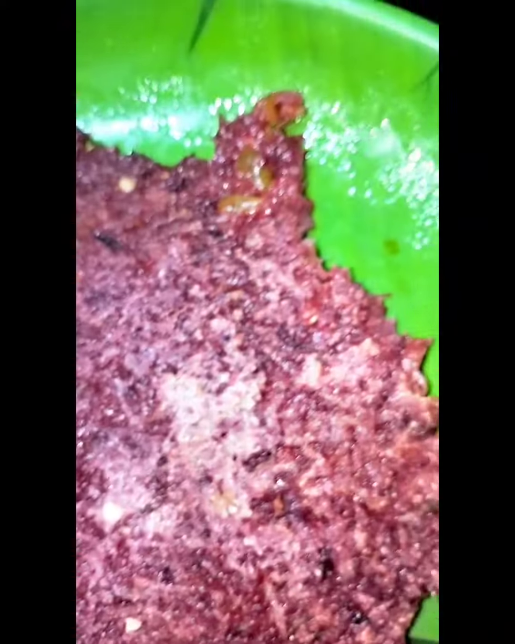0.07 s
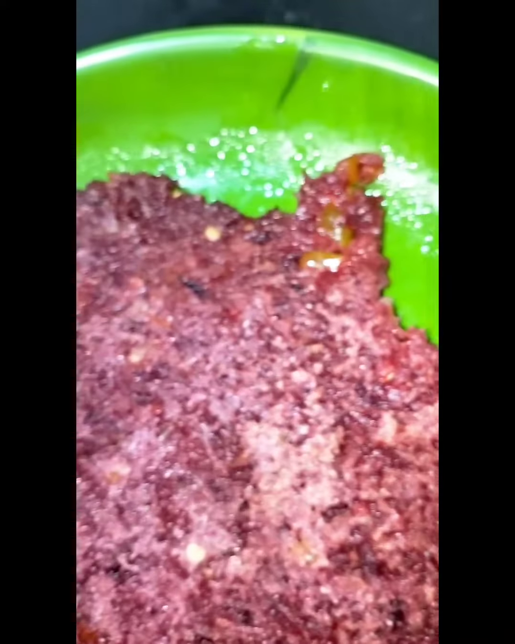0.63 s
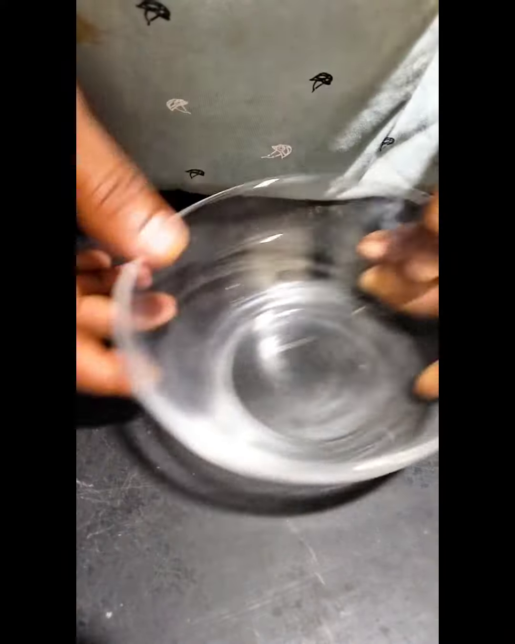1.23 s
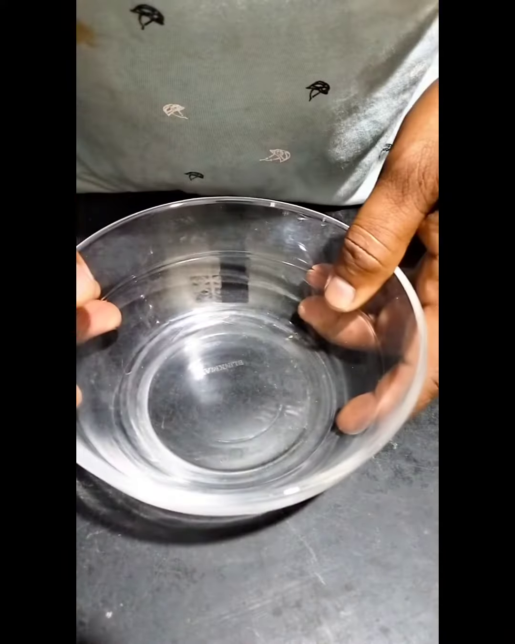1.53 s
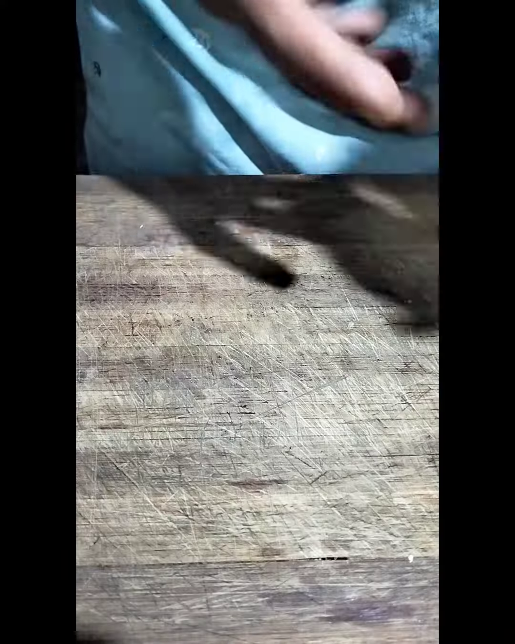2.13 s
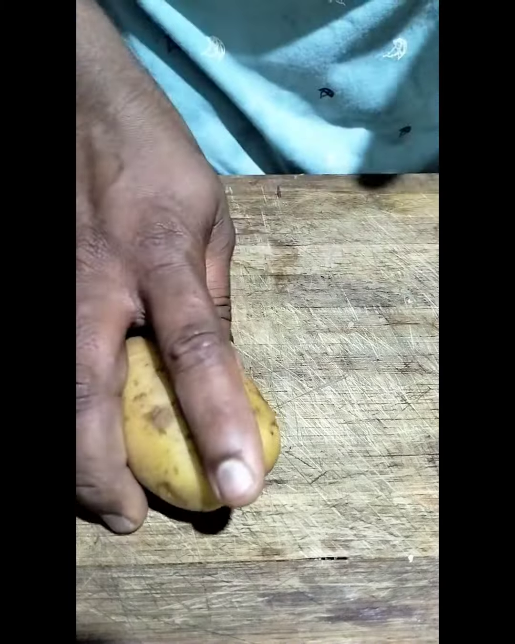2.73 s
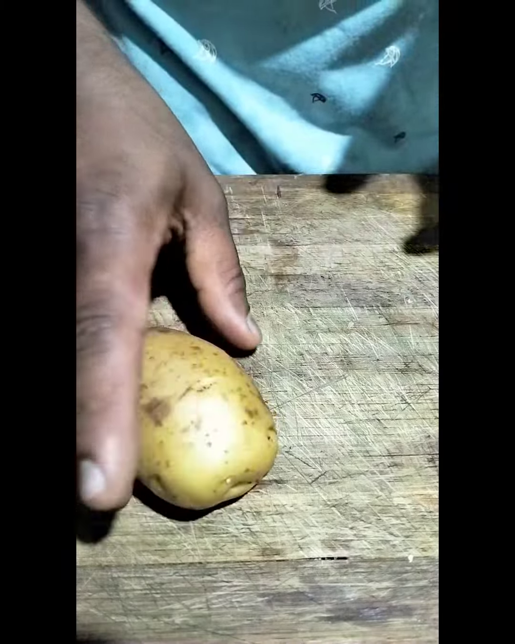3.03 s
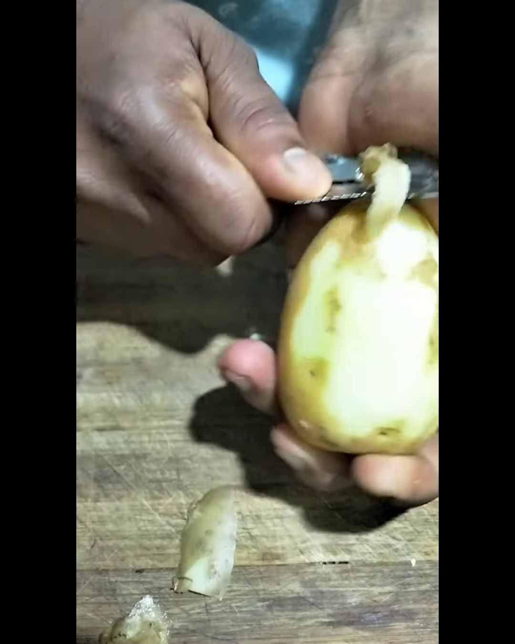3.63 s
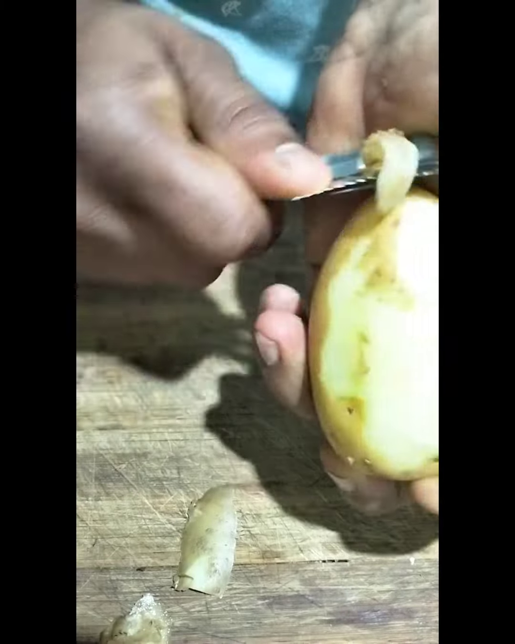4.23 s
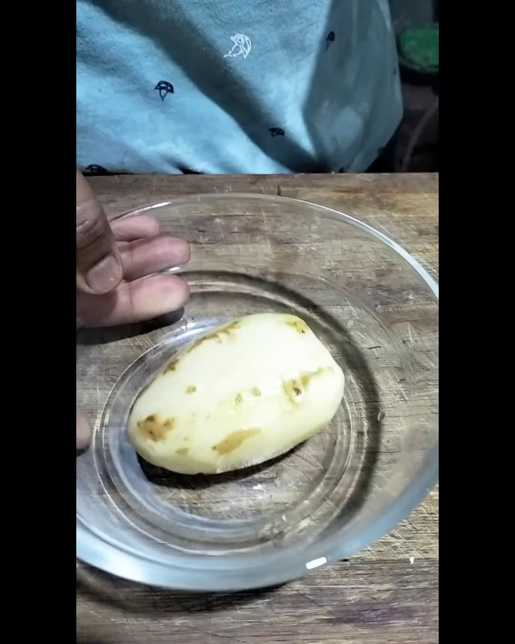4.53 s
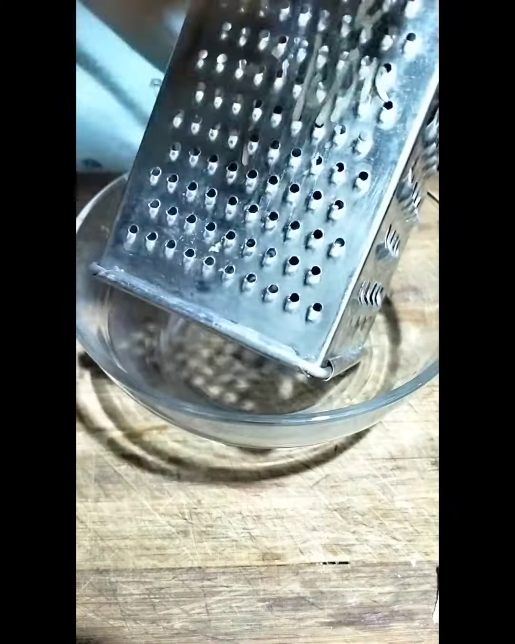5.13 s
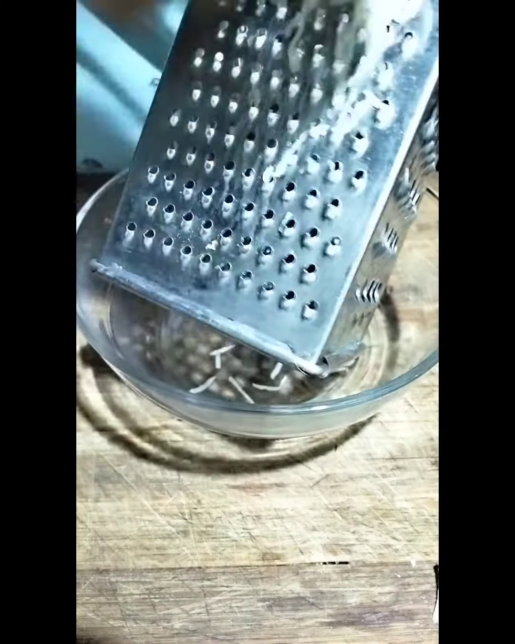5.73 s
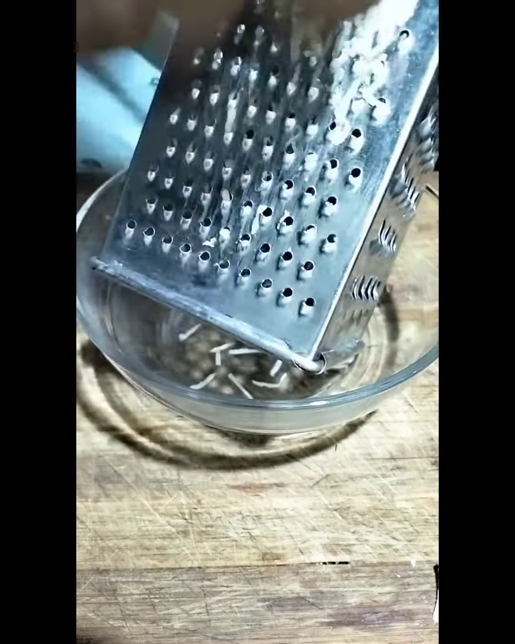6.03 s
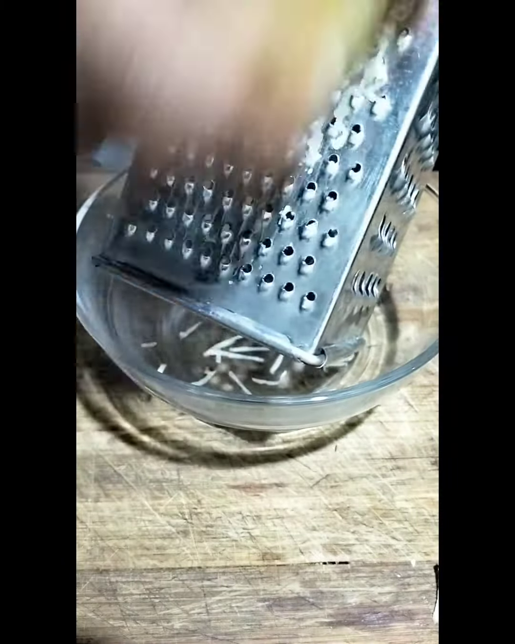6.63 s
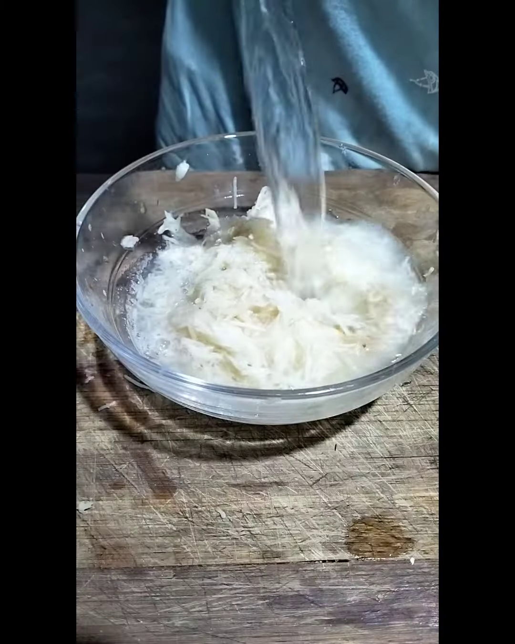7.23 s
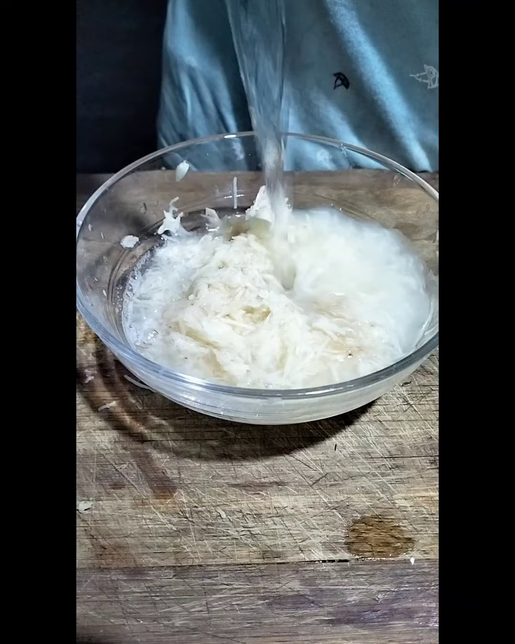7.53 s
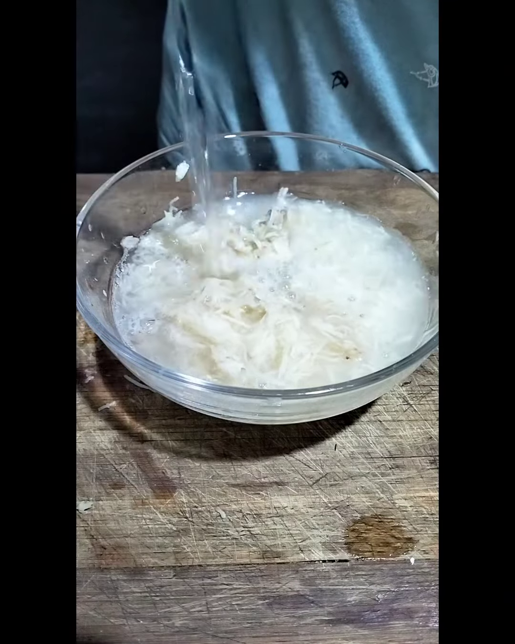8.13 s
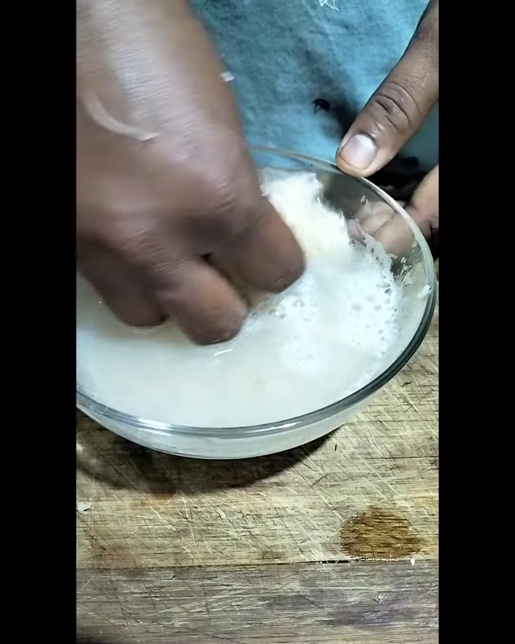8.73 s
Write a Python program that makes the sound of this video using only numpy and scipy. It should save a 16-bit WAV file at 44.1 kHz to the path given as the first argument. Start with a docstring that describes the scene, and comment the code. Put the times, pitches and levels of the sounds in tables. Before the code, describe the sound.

Close kitchen sounds: a bowl rocking on a counter, a potato's thud, crisp peeling, quick grating strokes and gurgling, splashing water.

```python
"""A small, hard kitchen, close up, over low rumble and a thin whine that shift from task to task.
A glass bowl knocks on the counter and rocks to rest. A potato thumps on a wooden board, is rolled
by hand and peeled with a crisp fizz. Seven strokes rasp it over a steel box grater standing in
the bowl. Water lands on the shreds in gobs, all gurgle, spray and bubbles; then fingers stir them."""
import sys
import numpy as np
from scipy import signal
from scipy.fft import rfft, irfft
from scipy.io import wavfile
from scipy.ndimage import uniform_filter1d

SR = 44100
rng = np.random.default_rng(int(sys.argv[2]) if len(sys.argv) > 2 else 0)


def dump_mix(stems):
    """Bounce the given channels to the path in sys.argv[1] as a 16-bit WAV at rate SR."""
    frames = np.atleast_2d(stems).T  # one column per channel
    limited = np.clip(frames, -1, 1)  # hard clip at full scale
    pcm = np.round(limited * 32767).astype(np.int16)
    wavfile.write(sys.argv[1], SR, pcm)


N = 391166
TIME = np.arange(N) / SR

# Table levels are relative: each layer has its own trim.
# five colours of room tone: f/Hz, level/dB
QUIET_AIR = [(15, -38), (25, -4), (54, -3.5), (118, -16.5), (363, -18.5), (404, -17.5), (450, -20),
             (2020, -44), (2300, -38), (2560, -45.5), (15000, -57.5)]
WHINY_AIR = [(15, -37.5), (25, -2.5), (106, 0), (354, -11.5), (438, -19), (903, -20.5), (1390, -24.5),
             (2180, -22), (2500, -18.5), (3350, -34), (4150, -12), (5010, -36.5), (7200, -39), (8000, -48),
             (9200, -37), (9900, -43), (10700, -39.5), (12000, -46), (15500, -50)]
KITCHEN_AIR = [(15, -55), (25, -12), (59, 0), (118, -11), (335, -13), (373, -18), (637, -19), (749, -26.5),
               (1280, -26.5), (5280, -44), (6900, -50), (15000, -55)]
BUSY_AIR = [(15, -34.5), (25, -14), (49, 1.5), (81, -14), (186, -10), (501, -27.5), (604, -33),
            (1090, -31.5), (1760, -41.5), (3730, -50), (5880, -51), (6370, -50), (15000, -63)]
LAST_AIR = [(15, -39), (25, 3), (125, -3), (158, -1), (257, -6.5), (415, -13), (1030, -21), (2180, -36),
            (5570, -42), (6540, -39.5), (15000, -57)]
# room tone cues: start/s, end/s, level/dB, colour
AIR_CUES = [(0, 0.784, -56, QUIET_AIR), (0.798, 3.126, -49, WHINY_AIR), (3.134, 4.46, -51.5, KITCHEN_AIR),
            (4.466, 6.897, -46, BUSY_AIR), (6.903, 8.887, -55.5, LAST_AIR)]
# narrow bands of hiss: start/s, end/s, f/Hz, width/Hz, level/dB
WHINE_BANDS = [(.797, 3.127, 2520, 100, -58), (.797, 3.127, 4170, 330, -55), (0, 0.66, 6000, 120, -96),
               (0, .797, 6430, 150, -86), (0.89, 8.88, 6560, 930, -77)]
# reverb time: f/Hz, t60/s
ROOM_DECAY = [(80, 0.2), (300, 0.22), (1100, 0.15), (2500, 0.18), (6000, 0.16), (15000, .14)]
# colour of the reflections: f/Hz, level/dB
REVERB_EQ = [(60, -6), (400, 0), (750, -1), (950, -2.5), (1600, 2), (2100, 2), (15000, 0)]
# standing waves between the walls: f/Hz, level/dB, t60/s
STANDING_WAVES = [(84, 2, .65), (151, 0, .6), (192, -2, .4), (287, 1, .35), (350, -4, .35), (540, -3, .4),
                  (902, -3, .4), (947, -2, .45), (1027, -4, .4), (1081, 4, .55), (1164, -2, .5),
                  (1224, -2, .5), (1305, 0, .45), (1389, -1, .4), (1443, 0, .4), (1533, 0, .4),
                  (1610, -1, .4), (1750, -1, .3), (1986, 4, .3)]

# fingers pushing the soaked shreds: t/s, level/dB
STIR_FADER = [(8.56, -76), (8.63, -70), (8.762, -53.5), (8.86, -56)]
# wet crackle and low slosh: f/Hz, level/dB
CRACKLE_EQ = [(300, -6), (600, -6), (1600, 2.5), (2300, -28), (3900, -13), (5200, -25), (6700, -8),
              (8000, -30), (15000, -23)]
SLOSH_EQ = [(40, -13), (90, 9), (220, 1.5), (600, -12), (1500, -47)]

# knife bites: t/s at the deepest, cut level/dB, fizz level/dB, rise/(dB/s)
PEEL_BITES = [(3.215, -55, -55, 550), (3.24, -53, -40, 2200), (3.466, -42.5, -45, 900),
              (3.5, -31.5, -34, 700), (4.05, -50.5, -55, 500), (4.09, -40.5, -42.5, 650),
              (4.44, -69, -61, 350)]
# the cut and its fine fizz: f/Hz, level/dB
CUT_EQ = [(500, -9), (950, -4.5), (1900, -15), (2900, -3), (4400, 3), (5300, 4), (6800, -4), (8200, -13),
          (11000, -30), (15000, -26.5)]
FIZZ_EQ = [(3000, -22), (7000, -3), (9000, -9), (12000, 2.5), (15500, -2)]
# the peel breaks: t/s, level/dB
PEEL_SNAPS = [(3.238, -31.5), (3.242, -41), (3.747, -35), (3.755, -38.5), (3.968, -51), (4.2453, -48.5),
              (4.401, -50)]
# colour of a snap: f/Hz, level/dB
SNAP_EQ = [(800, -23), (3000, 2.5), (4800, 6.5), (8000, -5), (15000, -24)]

# the potato lands and settles: t/s, level/dB, tilt/(dB/octave)
POTATO_HITS = [(2.588, 0.5, 1.5), (2.597, -12.5, 5), (2.6036, -10, -1)]
# the thud, skin on wood and the palm: f/Hz, level/dB
THUD_EQ = [(35, -22), (75, 9.5), (190, 5), (290, 8), (420, -7), (850, -10), (1450, -9.5), (2000, -15.5),
           (4400, -21.5), (5300, -34.5), (7400, -35.5), (9000, -46.5), (15000, -44)]
RUB_EQ = [(200, 1), (700, -0.5), (1500, 7), (3000, -4.5), (5000, -11), (8000, -19), (15000, -31)]
PALM_EQ = [(1000, -30), (3000, -10), (7500, 2), (9500, -6), (15000, -7)]
# ring of the wooden board: f/Hz, level/dB, t60/s
BOARD_MODES = [(86.3, -21, 0.95), (153.7, -8.5, 0.52), (277, -4, 0.18), (620, -6.5, 0.2), (735, -29, 0.2),
               (862, 5, 0.09), (1295, -0.5, 0.12), (1444, 10, 0.051), (1610, 5, 0.077), (1685, -1, 0.13)]
# a hand rolls the potato: t/s, level/dB
RUB_FADER = [(2.75, -64), (2.866, -52), (2.912, -51), (2.945, -39.5), (3.0, -56.5), (3.125, -60.5)]

# bowl on counter: t/s, knock level/dB, tilt/(dB/octave), ring level/dB
BOWL_HITS = [(1.1035, 3, 1.5, -27), (1.1656, 0.5, 1, -39), (1.188, -1.5, -0.5, -33.5),
             (1.201, -5, 0, -63.5), (1.249, -18.5, -6.5, -59), (1.26, -10.5, -1, -58),
             (1.277, -15, -6.5, -48), (1.312, -23, -11, -51), (1.3536, -4, 4, -36.5), (1.407, -12, -7, -50)]
# the bowl knocking and rolling: f/Hz, level/dB
KNOCK_EQ = [(50, -26.5), (85, -11), (200, -19.5), (320, 0), (440, -27), (700, -13.5), (1080, -0.5),
            (1550, -9), (1900, -12.5), (3300, -20.5), (4400, -31), (5400, -52.5), (15000, -66)]
ROLL_EQ = [(35, -44), (60, -30), (206, -23.5), (291, -8), (404, -10), (529, -7.5), (583, -16.5), (944, 7),
           (2780, -30), (4240, -63.5), (6000, -62), (7800, -94), (13200, -120)]
# the bowl rocks to rest: t/s, level/dB
ROLL_FADER = [(1.21, -22), (1.27, -23), (1.31, -19), (1.345, -20.5), (1.38, -28), (1.42, -27), (1.45, -45),
              (1.56, -39.5), (1.63, -63)]
# the glass singing and its wall clinking: f/Hz, level/dB, t60/s
GLASS_MODES = [(6790, -3.5, 0.2), (6820, -11, 0.3), (10250, -12.5, .25), (10310, -15, .4),
               (12720, -25, .35), (14600, -20.5, .28)]
CLINK_MODES = [(2250, -4, .25), (2719, -7, .28), (3150, 0, .11), (3429, -2, .14)]
# rough glassy ring as the bowl's foot slides on the counter: f/Hz, level/dB, t60/s
FOOT_SCRAPE_MODES = [(6900, -3.5, .09), (10430, 1, 0.036), (12600, -1, 0.032), (14620, -5, 0.03)]

# strength of the pour: t/s, gurgle level/dB, spray level/dB
POUR_FADERS = [(6.905, -47, -46), (7.131, -43.5, -46.5), (7.149, -48, -54.5), (7.263, -48, -48.5),
               (8.143, -44, -46.5), (8.225, -48.5, -42), (8.285, -43, -55), (8.443, -37, -38.5),
               (8.535, -40.5, -49)]
# how much of the jet meets standing water: t/s, share/0-1
POOL_SHARE = [(6.9, 0), (8.1, 0.29), (8.35, 0.98), (8.54, 0.78)]
# water on shreds, into standing water, and as spray: f/Hz, level/dB
SHALLOW_EQ = [(120, -44), (200, -4), (223, -28), (286, 12.5), (441, -28), (474, -9), (670, -8), (756, -2.5),
              (1060, -2.5), (1150, -15), (1530, -9), (1970, -18), (3500, -12.5), (4550, -30), (7700, -120)]
DEEP_EQ = [(88, -76), (150, -3), (195, 2), (337, -8), (476, 1.5), (769, -2), (1030, -18), (1570, -8.5),
           (2510, -16.5), (3080, -22), (4000, -15), (5200, -67), (8800, -120)]
SPRAY_EQ = [(1500, -12), (2300, -18), (3200, -5), (4400, 1), (5100, -3.5), (5800, -3), (7100, -1.5),
            (7900, -12.5), (10000, -11), (12500, -9), (15500, -15.5)]
# the bowl drummed by water: f/Hz, level/dB, t60/s
WET_BOWL_MODES = [(662, -1, 0.084), (903, -1, 0.063), (1026, -4, 0.066), (1527, 0.5, 0.03)]
# the biggest gulps: t/s, level/dB
BIG_PLOPS = [(6.979, -37), (7.076, -28), (7.101, -28), (7.132, -34), (7.319, -26), (7.404, -33),
             (7.538, -29), (7.58, -24.5), (7.615, -30), (7.69, -30.5), (7.863, -33.5), (7.938, -27),
             (8.017, -31), (8.105, -24.5), (8.13, -32), (8.272, -27), (8.324, -25), (8.397, -24),
             (8.493, -24.5)]
# bright single bubbles, and clusters of air dragged under: t/s, level/dB, f/Hz
BRIGHT_BUBBLES = [(7.065, -25.5, 6140), (7.257, -32.5, 6980), (7.429, -26, 4900), (7.437, -27, 4820),
                  (7.6028, -22.5, 6640), (7.657, -27.5, 4780), (7.6906, -27.5, 7140), (7.731, -26.5, 5000),
                  (7.7385, -25.5, 4330), (7.935, -25, 3770), (8.072, -27, 4100), (8.1064, -27.5, 4000),
                  (8.2136, -24, 4250), (8.3923, -30, 4100), (8.462, -24.5, 4940), (8.5142, -23.5, 4550)]
BUBBLE_CLUSTERS = [(7.076, -33, 2130), (7.278, -32.5, 1560), (7.32, -32, 2160), (7.9365, -29.5, 1520),
                   (8.0175, -31.5, 1580), (8.31, -32, 1580), (8.408, -18.5, 3120), (8.461, -29, 1690)]

# strokes down through the teeth and back: t/s, length/s, level/dB, peak position/0-1
DOWN_STROKES = [(4.988, 0.16, -18, 0.35), (5.288, 0.15, -17.5, 0.49), (5.595, .16, -18, 0.43),
                (5.885, 0.15, -18.5, 0.49), (6.175, .15, -17.5, 0.36), (6.46, 0.13, -18.5, 0.43),
                (6.755, 0.15, -17.5, 0.52)]
BACK_STROKES = [(5.15, .15, -30, 0.47), (5.45, 0.16, -30.5, 0.5), (5.75, .15, -30.5, 0.49),
                (6.01, 0.17, -30.5, 0.65), (6.32, 0.14, -31.5, 0.71), (6.59, 0.16, -33, 0.72)]
# teeth tearing, potato sliding back, board shaking: f/Hz, level/dB
RASP_EQ = [(120, -50.5), (200, -6.5), (471, -15), (564, -4), (742, -8), (1050, -1), (1510, -7),
           (1910, -13.5), (3010, -5.5), (4260, -1.5), (5910, -8), (7090, -2.5), (7900, -12), (11600, -11),
           (15500, -13.5)]
SLIDE_EQ = [(120, -30.5), (200, -5), (371, -12), (769, -3), (842, -5), (1030, -1), (1210, -6), (1880, -15),
            (2090, -9.5), (2600, -13), (4260, -4.5), (4920, -10.5), (7090, -14), (7900, -17), (15500, -19)]
SHAKE_EQ = [(30, -30), (52, -14), (82, 4.5), (110, -12), (145, -11), (190, -6.5), (240, -22), (600, -33)]
# the grater is picked up; its foot hits the glass: t/s, level/dB
PICKUP_CLINKS = [(4.745, -64), (4.885, -66)]
FOOT_HITS = [(5.325, -12), (5.616, -11), (5.908, -19), (6.206, -12), (6.48, -18.5), (6.799, -14)]
# ring of the steel box, the back stroke, the pickup and the foot: f/Hz, level/dB, t60/s
STEEL_MODES = [(531, -10, .2), (1016, -3.5, .15), (1500, -5, 0.21), (2234, 1.5, .55), (2220, -3, 0.5),
               (2444, -6.5, 0.34), (2993, 2, 0.31), (3700, -2.5, 0.28), (3850, 4.5, .18), (4300, -6, 0.13),
               (4320, -2, 0.32), (4800, -5, .2), (7300, 4, .12), (7300, 1, .08)]
SLIDE_MODES = [(1040, 0, 0.073), (800, -5.5, 0.027), (7030, 2.5, 0.026)]
PICKUP_MODES = [(1060, 6.5, .4), (2234, -3.5, .5), (3770, -2.5, .35), (4380, -6, .25)]
FOOT_MODES = [(1074, -3, .044), (1484, -1, .035), (2327, -10, .17)]

POUR_START_S, POUR_END_S = 6.903, 8.543


def amp(db):
    """Decibels to gain."""
    return 10 ** (np.asarray(db) / 20)


def unit_rms(x):
    """Scales to rms 1."""
    return x / np.sqrt(np.mean(x ** 2) + 1e-20)


def curve_at(points, hz):
    """Reads a table on a log-frequency axis."""
    f, value = np.transpose(points)
    return np.interp(np.log(hz + 1), np.log(f + 1), value)


def add(mix, s, sound):
    """Drops a sound into the mix at time s."""
    part = mix[round(s * SR):][:len(sound)]
    part += sound[:len(part)]


def gate(start, end):
    """Open from start to end, with 2 ms ramps."""
    return uniform_filter1d(((TIME >= start) & (TIME < end)) * 1., size=90)


def fader(rows):
    """A level ride as a gain, silent outside its span."""
    s, db = np.transpose(rows)
    return amp(np.interp(TIME, s, db)) * gate(s[0], s[-1])


def swell(s, rise_db_per_s, fall_db_per_s):
    """A gain that climbs to 1 at time s and dies away."""
    return amp(-np.maximum(rise_db_per_s * (s - TIME), fall_db_per_s * (TIME - s)).clip(0, 200))


def hiss(gain):
    """Steady noise shaped by gain(f), rms 1."""
    return unit_rms(irfft(rfft(rng.standard_normal(N)) * gain(np.fft.rfftfreq(N, 1 / SR)), N))


def flicker(rate_hz, depth_db):
    """A gain that wavers at random up to about this rate, rms 1."""
    return unit_rms(amp(depth_db * hiss(lambda f: (f > 5) / (1 + (f / rate_hz) ** 4))))


def through(x, response):
    """Plays a sound through an impulse response."""
    return signal.oaconvolve(x, response)[:N]


def pulse(eq, tilt_db=0):
    """The tightest click with this colour, peak 1; harder contact tilts it brighter."""
    hz = abs(np.fft.fftfreq(4096, 1 / SR))
    log_gain = np.log(amp(curve_at(eq, hz) + tilt_db * np.log2(np.clip(hz, 700, 6000))))
    minimum_phase = np.exp(np.conj(signal.hilbert(log_gain)))
    click = np.fft.ifft(minimum_phase).real[:len(hz) * 3 // 4]
    return click / abs(click).max()


def ring(modes, uneven_db=0):
    """One dying sine a mode; each blow favours some at random."""
    t = TIME[:SR]
    luck = rng.standard_normal(len(modes))
    return sum(amp(db + uneven_db * k - 60 * t / t60) * np.sign(k) * np.sin(2 * np.pi * hz * t)
               for (hz, db, t60), k in zip(modes, luck))


def grains(response, per_s, spread_db):
    """Random clicks of uneven size, each sounding this response; rms 1."""
    size = amp(spread_db * np.minimum(rng.exponential(1, N), 3.5))
    clicks = size * rng.choice([-1, 1], N) * (rng.random(N) < per_s / SR)
    return unit_rms(through(clicks, response))


def in_room(x, wet_db, modes_db=-100):
    """Adds dense reflections off near walls and, for loud blows, standing waves."""
    t = TIME[:SR]
    taps = rng.choice([-1., 1.], SR) * (rng.random(SR) < .15)
    hz, age, bands = signal.stft(taps, SR, nperseg=256)
    decay = amp(-60 * age / curve_at(ROOM_DECAY, hz)[:, None])
    bins = rfft(signal.istft(bands * decay, SR)[1][:SR])
    bins /= np.sqrt(uniform_filter1d(abs(bins) ** 2, size=120))  # equal energy in every band
    tail = irfft(bins * amp(curve_at(REVERB_EQ, np.arange(len(bins)))), SR) * (t < .5)
    response = amp(wet_db) * tail + amp(modes_db) * ring(STANDING_WAVES)
    return x + through(x, response * np.clip(t / 0.0011, 0, 1))


def room_tone():
    """The bed: rumble and whining hiss, switching colour on cue."""
    out = sum(gate(start, end) * amp(db) * hiss(lambda f: amp(curve_at(eq, f)))
              for start, end, db, eq in AIR_CUES)
    for start, end, hz, width, db in WHINE_BANDS:
        out += gate(start, end) * amp(db) * hiss(lambda f: 1 / (1 + (2 * (f - hz) / width) ** 2))
    return out


def stirring():
    """Fingers break the surface and push the soaked shreds: wet crackle over a low slosh."""
    hand = fader(STIR_FADER)
    squelch = amp(-56.5) * swell(8.698, rise_db_per_s=1500, fall_db_per_s=1000)
    crackle = (amp(-10) * hand + squelch) * grains(pulse(CRACKLE_EQ), per_s=2500, spread_db=3)
    slosh = amp(-0.5) * hand * grains(pulse(SLOSH_EQ), per_s=200, spread_db=0.5)
    return crackle + slosh


def burst(eq, samples, fade_s):
    """A quick spit of coloured noise, peak 1."""
    noise = rng.standard_normal(samples) * np.exp(-TIME[:samples] / fade_s)
    spit = through(noise, pulse(eq))
    return spit / abs(spit).max()


def peeling(end_s=4.462):
    """The blade bites deeper, bursting tiny cells, then slips out; the peel snaps."""
    out = np.zeros(N)
    snagging = flicker(rate_hz=82, depth_db=1.5)  # the edge catches and frees itself
    cut = snagging * grains(pulse(CUT_EQ), per_s=3000, spread_db=3)
    fizz = snagging * grains(pulse(FIZZ_EQ), per_s=6000, spread_db=4)
    for s, cut_db, fizz_db, rise in PEEL_BITES:
        bite = swell(s, rise, fall_db_per_s=680) * (TIME < end_s)
        out += bite * (amp(cut_db - 2) * cut + amp(fizz_db + 1.5) * fizz)
    for s, db in PEEL_SNAPS:
        add(out, s, amp(db - 4) * burst(SNAP_EQ, SR // 20, fade_s=0.0039))
    return in_room(out, wet_db=-14)


def potato():
    """A dull thud rings the board; then the skin rubs, the palm hisses and the wood rumbles."""
    thuds, wood = np.zeros((2, N))
    for s, db, tilt_db in POTATO_HITS:
        add(thuds, s, amp(db + 1) * pulse(THUD_EQ, tilt_db))
    add(wood, POTATO_HITS[0][0], amp(-22.5) * ring(BOARD_MODES))
    skin = fader(RUB_FADER) * amp(1.5) * grains(pulse(RUB_EQ), per_s=990, spread_db=-0.5)
    palm = amp(-61) * hiss(lambda f: amp(curve_at(PALM_EQ, f)))
    rumble = amp(-48.5) * hiss(lambda f: 1 / (1 + ((f - 165) / 30) ** 2))
    moving = gate(2.72, 3.127) * np.clip((TIME - 2.72) / 0.08, 0, 1) * flicker(rate_hz=14, depth_db=3)
    return in_room(thuds, wet_db=-0.5, modes_db=-65.5) + wood + skin + (palm + rumble) * moving


def clack(hz, swell_s):
    """A stiff surface gives under a blow and swings for a few cycles."""
    t = TIME[:SR // 50]
    return t / swell_s * np.exp(1 - t / swell_s) * np.sin(2 * np.pi * hz * t)


def bowl(slide_start_s=1.31, slide_end_s=1.615, fade_db_per_s=49):
    """The bowl bounces, rocks and slides on its foot; the counter booms and the glass sings."""
    knocks, glass = np.zeros((2, N))
    for s, db, tilt_db, ring_db in BOWL_HITS:
        contact_s = 0.00053 * 2 ** (-tilt_db / 4)  # softer contacts last longer
        add(knocks, s, amp(db - 4.5) * pulse(KNOCK_EQ, tilt_db))
        add(knocks, s, amp(db - 6) * clack(hz=1197 + 40 * tilt_db, swell_s=contact_s))
        add(glass, s, amp(ring_db - 1.5) * ring(GLASS_MODES, uneven_db=1))
        add(glass, s, amp(db + tilt_db - 38) * ring(CLINK_MODES, uneven_db=2))
    rolling = fader(ROLL_FADER) * amp(-9) * grains(pulse(ROLL_EQ), per_s=1500, spread_db=1)
    slowing = gate(slide_start_s, slide_end_s) * amp(-49 - fade_db_per_s * (TIME - slide_start_s))
    scrape = slowing * grains(ring(FOOT_SCRAPE_MODES), per_s=990, spread_db=5)
    glass *= flicker(rate_hz=45, depth_db=3.5)  # the tilting bowl swings its sound about
    return in_room(knocks + rolling, wet_db=-0.5, modes_db=-61.5) + in_room(glass + scrape, wet_db=-4.5)


def pour_times(count):
    """Loosely spaced moments all through the pour."""
    return POUR_START_S + (POUR_END_S - POUR_START_S) * (np.arange(count) + rng.random(count)) / count


def gob_beat(fade_s=0.0072, scatter_db=4, steady_jet=0.29):
    """Gobs land at once and spread out over a steady jet; a gain, rms 1 during the pour."""
    beat = np.zeros(N)
    for s in pour_times(count=66):
        size = amp(scatter_db * np.clip(rng.standard_normal(), -2, 1.5))
        add(beat, s, size * np.exp(-TIME[:SR // 10] / fade_s))
    beat += steady_jet
    return beat / np.sqrt(np.mean(beat[(TIME > POUR_START_S) & (TIME < POUR_END_S)] ** 2))


def bubble(hz, cycles):
    """Trapped air pings: a soft attack, a quick decay, pitch rising as it nears the surface."""
    turns = np.arange(int(6 * cycles * SR / hz)) * hz / SR
    age = turns / cycles
    return (1 - np.exp(-4 * age)) * np.exp(-age) * np.sin(2 * np.pi * turns * (1 + 0.0094 * age))


def froth(eq, low_hz, high_hz, cycles, spread_db, count):
    """A cloud of bubbles of random pitch and size, rms 1 during the pour."""
    out = np.zeros(N)
    length_s = POUR_END_S - POUR_START_S
    for when, pitch, size, life in rng.random((count, 4)):
        hz = low_hz * (high_hz / low_hz) ** pitch
        db = spread_db * min(-np.log(size), 3)
        add(out, POUR_START_S + when * length_s, amp(db) * hz * bubble(hz, cycles * (.5 + life)))
    return unit_rms(through(out, pulse(eq))) * np.sqrt(length_s * SR / N)


def jet():
    """The jet drums on the bowl and throws spray; its gurgle deepens in standing water."""
    s, gurgle_db, spray_db = np.transpose(POUR_FADERS)
    pool = np.interp(TIME, *np.transpose(POOL_SHARE))
    gobs = gob_beat()
    drumming = amp(-7.5) * grains(ring(WET_BOWL_MODES), per_s=300, spread_db=5.5)
    shallow = amp(-1) * froth(SHALLOW_EQ, low_hz=440, high_hz=3450, cycles=2.6, spread_db=-.5, count=1500)
    deep = froth(DEEP_EQ, low_hz=182.5, high_hz=4080, cycles=2.6, spread_db=2, count=1500)
    fizz = amp(-3.5) * froth(SPRAY_EQ, low_hz=2000, high_hz=15000, cycles=4, spread_db=4.5, count=3400)
    spatter = amp(-10.5) * grains(pulse(SPRAY_EQ), per_s=310, spread_db=9)
    gurgle = np.sqrt(1 - pool) * (shallow * gobs + drumming) + np.sqrt(pool) * deep * gobs
    gurgle *= amp(np.interp(TIME, s, gurgle_db) - 2.5)
    spray = (fizz + spatter) * gobs * amp(np.interp(TIME, s, spray_db) + 0.5)
    return gurgle + spray


def water():
    """The pour with its accents: gulps hit the bowl, bubbles ping alone and in clusters."""
    out = jet()
    small_plops = [(s, rng.normal(-37, 1.5)) for s in pour_times(count=16)]
    small_bubbles = [(s, rng.normal(-32, 1.5), rng.uniform(3280, 7200)) for s in pour_times(count=12)]
    for s, db in BIG_PLOPS + small_plops:
        add(out, s, amp(db - 10) * pulse(DEEP_EQ))
        add(out, s, amp(db - 11) * ring(WET_BOWL_MODES, uneven_db=3))
        add(out, s, amp(db - 5) * pulse(SPRAY_EQ))
    for s, db, hz in BRIGHT_BUBBLES + small_bubbles:
        add(out, s, amp(db + 3) * bubble(hz, cycles=6.7))
        add(out, s, amp(db - 2) * burst(SPRAY_EQ, SR // 50, fade_s=0.0026))
    for s, db, hz in BUBBLE_CLUSTERS:
        for delay, detune, softness in rng.random((5, 3)):
            ping = bubble(hz * 2 ** (detune - .5), cycles=5)
            add(out, s + 0.013 * delay ** 2, amp(db - 1 - 6 * softness) * ping)
    return in_room(out, wet_db=-7) * gate(POUR_START_S, POUR_END_S)


def strokes(rows, sharpness):
    """Hand speed as a gain: each stroke swells to a peak and slows to rest."""
    speed = np.zeros(N)
    for s, length, db, peak in rows:
        travel = np.interp(TIME, [s, s + length * np.clip(peak, .1, .9), s + length], [0, .5, 1])
        speed += amp(db) * abs(np.sin(np.pi * travel)) ** sharpness
    return speed


def board_shake(lag_s=0.051):
    """The board takes up the hand's push with a lag and rumbles on after it."""
    force = amp(-11) * strokes(DOWN_STROKES, sharpness=1.56)
    force += amp(-15.5) * strokes(BACK_STROKES, sharpness=1.2)
    hold = np.exp(-1 / (lag_s * SR))
    rumble = hiss(lambda f: amp(curve_at(SHAKE_EQ, f) - 60 * (f > 900)))
    return signal.lfilter([1 - hold], [1, -hold], force) * rumble


def grater():
    """Teeth tear the potato in dense clicks that ring the steel box; its foot knocks on the glass."""
    catching = flicker(rate_hz=59, depth_db=1.5)  # rows of teeth bite unevenly
    rasp = amp(-1.5) * grains(pulse(RASP_EQ), per_s=7000, spread_db=2) * catching
    slide = amp(-2) * grains(pulse(SLIDE_EQ), per_s=6000, spread_db=3) * catching
    rattle = amp(-10) * grains(ring(SLIDE_MODES), per_s=220, spread_db=5.5)
    contact = rasp * strokes(DOWN_STROKES, sharpness=1.8)
    contact += slide * strokes(BACK_STROKES, sharpness=1.28)
    contact += rattle * strokes(BACK_STROKES, sharpness=1.7)
    for s, db in FOOT_HITS:
        add(contact, s, amp(db - 4.5) * pulse(KNOCK_EQ, tilt_db=0.5))
        add(contact, s, amp(db - 7) * ring(FOOT_MODES))
    steel = amp(-58.5) * through(contact, ring(STEEL_MODES))
    pickup = np.zeros(N)
    for s, db in PICKUP_CLINKS:
        add(pickup, s, amp(db) * ring(PICKUP_MODES))
    grating = board_shake() + steel + in_room(contact, wet_db=-9, modes_db=-64.5)
    return pickup + grating * gate(4.98, 6.895)


def scene():
    """The full mix, dead centre."""
    mono = room_tone() + bowl() + potato() + peeling() + grater() + water() + stirring()
    return np.array([mono, mono])


def record(dry):
    """Clips peaks at full scale, then cuts the very top."""
    low_pass = signal.firwin(511, cutoff=15850, window=("kaiser", 9), fs=SR)
    return signal.oaconvolve(np.clip(dry, -1, 1), low_pass[None], "same")


dry = scene()
out = record(dry)
dump_mix(out)
```